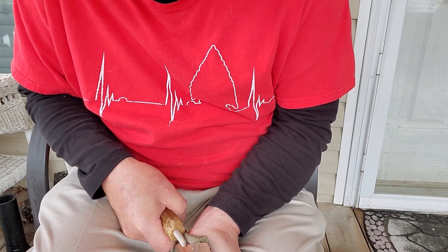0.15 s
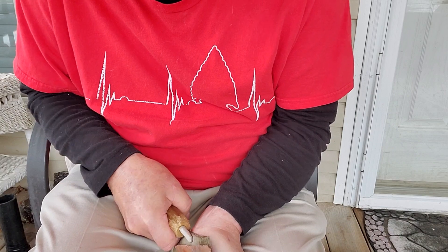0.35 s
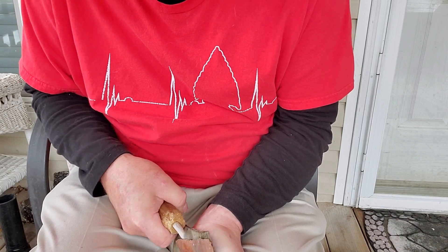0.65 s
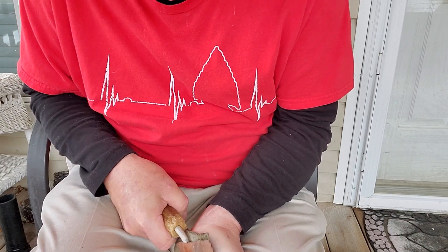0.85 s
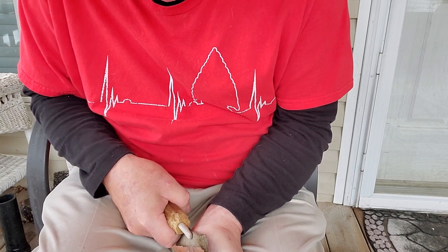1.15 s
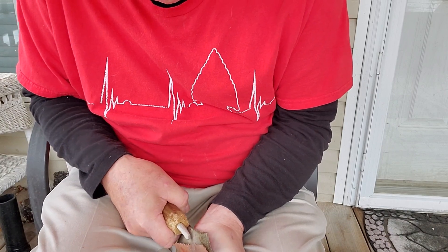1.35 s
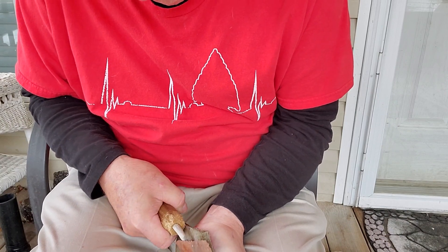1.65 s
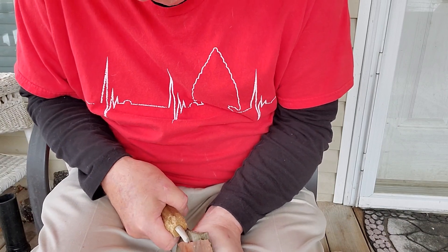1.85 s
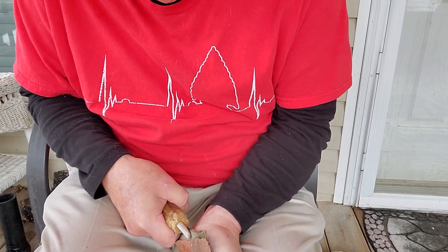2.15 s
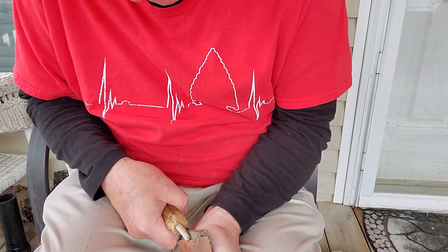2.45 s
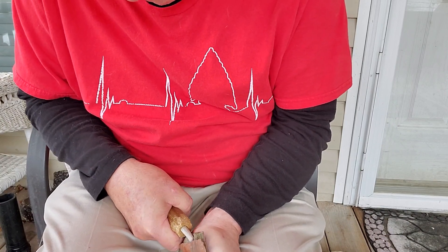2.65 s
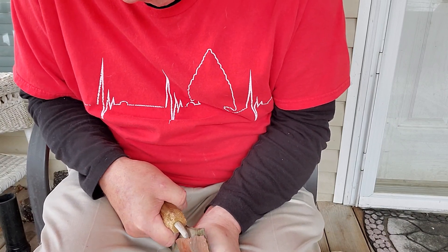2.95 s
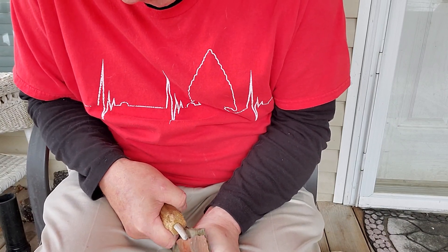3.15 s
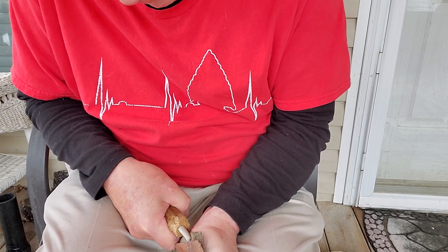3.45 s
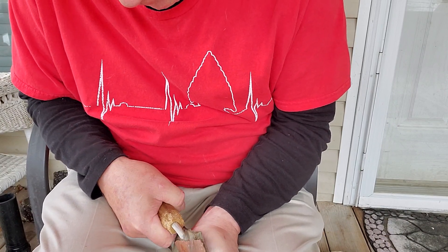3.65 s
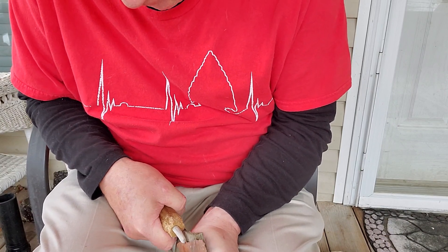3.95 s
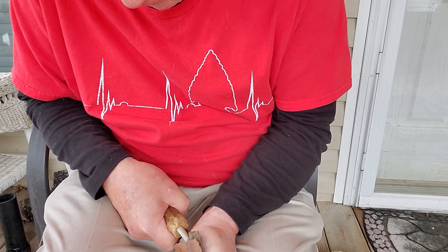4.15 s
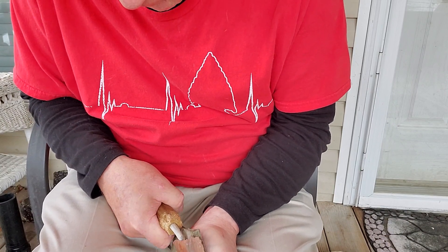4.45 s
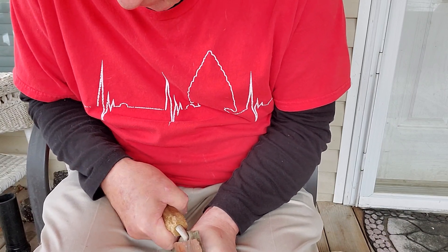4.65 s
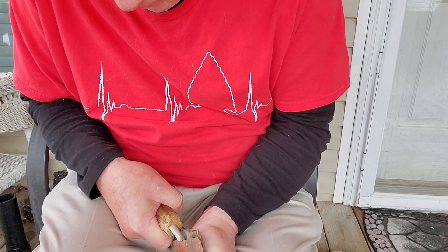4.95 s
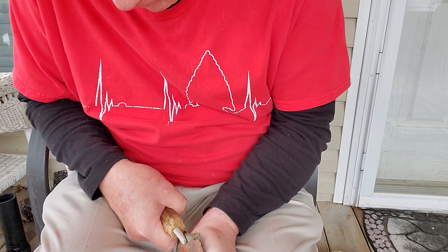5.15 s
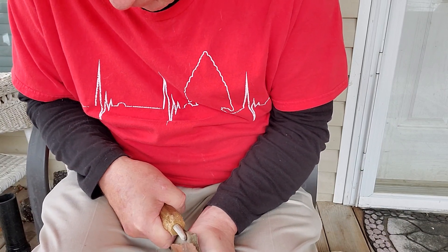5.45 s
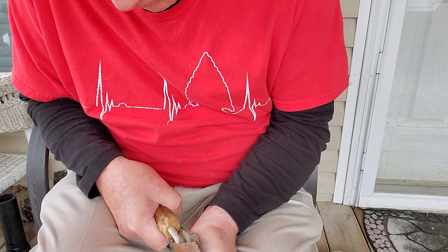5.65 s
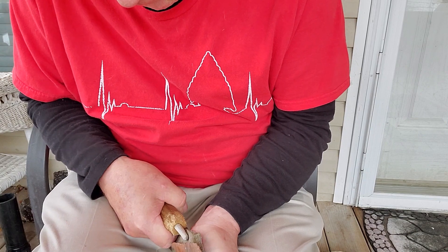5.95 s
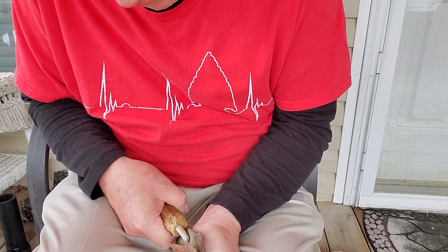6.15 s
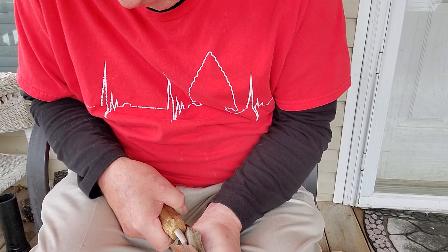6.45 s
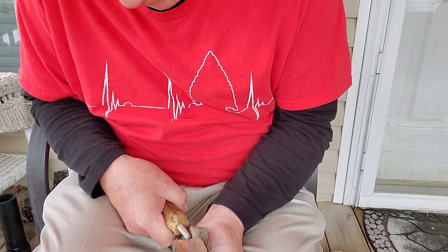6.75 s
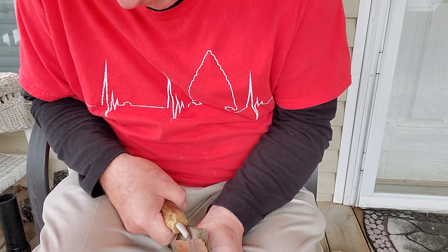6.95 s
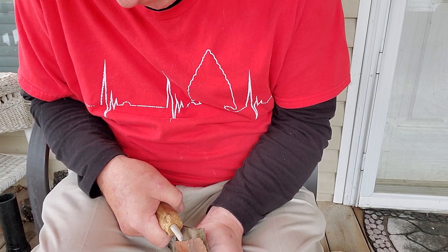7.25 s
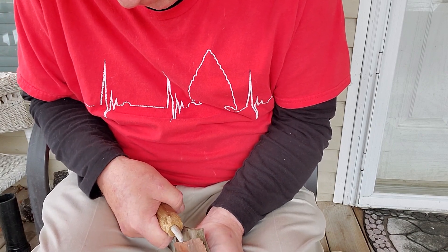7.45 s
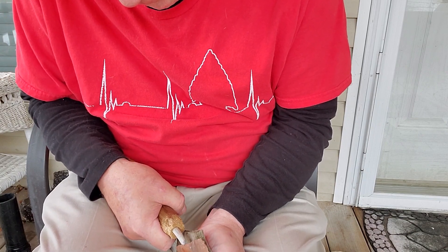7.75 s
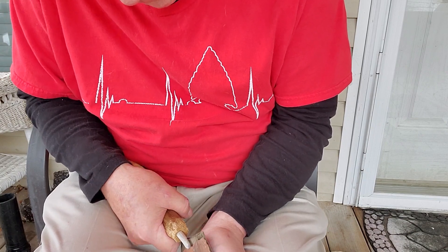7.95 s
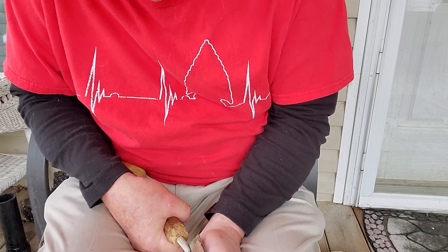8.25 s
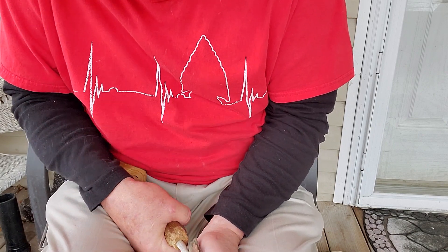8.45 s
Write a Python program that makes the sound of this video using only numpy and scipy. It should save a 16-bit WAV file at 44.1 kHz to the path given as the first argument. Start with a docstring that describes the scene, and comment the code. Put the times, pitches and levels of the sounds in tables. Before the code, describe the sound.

On a porch, a hand tool presses flakes off a piece of flint close to a stereo microphone, slightly to the right. Chips snap away in irregular clusters of tiny, bright cracks, loudest in the middle, with brief gritty rubs between them. Dull knocks sound in the wooden boards, mostly in the second half, and the snaps fade to light ticks. Distant traffic and an engine hum low throughout.

```python
"""A porch, with flint being pressure flaked close to a stereo microphone pair, a little to the right.
The tool tip slips and chips snap off in clusters of tiny cracks that ring stone, tool and hands.
Grit rubs under the tool, and dull knocks sound in the wooden boards nearby.
Far off, traffic rumbles and an engine pulls through two gears. A faint broad hiss lies behind it all;
a narrow hiss and one short peep sit near 4 kHz."""
import sys
import numpy as np
from scipy import signal
from scipy.fft import rfft, irfft, next_fast_len
from scipy.io import wavfile
from scipy.ndimage import uniform_filter1d, map_coordinates

SR = 44100
rng = np.random.default_rng(int(sys.argv[2]) if len(sys.argv) > 2 else 0)


def inscribe(sig):
    """Save sig as 16-bit PCM at rate SR to the path in sys.argv[1].

    A 1-D sig is mono; a 2-D sig holds one channel per row.
    Samples are clipped to [-1, 1] before scaling.
    """
    pcm = np.round(np.clip(np.atleast_2d(sig).T, -1, 1) * 32767)
    wavfile.write(sys.argv[1], SR, pcm.astype(np.int16))


N = 379260

# Swell of the far traffic and of the narrow hiss. Each row: time in seconds, level in dB.
RUMBLE_LEVEL = [(0, -53.5), (.8, -50.5), (3.2, -50), (3.55, -47.5), (3.9, -51), (5, -46), (5.7, -47),
                (6.8, -46), (7.3, -46.5), (8.6, -49)]
NARROW_HISS_LEVEL = [(0, -79), (.3, -76), (.6, -79), (1.2, -90), (3, -86.5), (7.5, -93.5), (8.6, -87)]
# Colours of the background. Each row: frequency in Hz, relative noise density in dB.
RUMBLE_SPECTRUM = [(15, -29.5), (25, -0.5), (55, -4), (85, 3.5), (117, -2.5), (224, -5.5), (361, -9.5),
                   (460, -13), (600, -65.5)]
RUSH_SPECTRUM = [(250, -41), (430, -14.5), (454, -4), (528, -3), (1010, -6), (1110, -10), (1830, -11.5),
                 (3600, -29), (4680, -57.5), (7920, -120)]
HISS_SPECTRUM = [(1940, -35.5), (3300, 0.5), (4830, -2.5), (5750, -2.5), (8640, -13.5), (11900, -12),
                 (13400, -23.5), (15100, -11), (16300, -25.5)]
NARROW_HISS_SPECTRUM = [(3500, -31.5), (3900, -5.5), (4150, 1), (4400, -5.5), (4900, -29)]
# The far engine's note, one list a gear. Each row: time in seconds, pitch in Hz, level in dB.
GEAR_NOTES = [
    [(0, 84.8, -47.5), (.4, 88.66, -47), (1.0, 91.4, -42), (1.4, 91.54, -50.5), (2, 93.9, -47),
     (3.2, 96.64, -52.5), (3.5, 97.3, -49), (4.3, 98.9, -66.5)],
    [(4.4, 80, -63.5), (5.37, 84.7, -38), (5.66, 83.75, -43.5), (6.17, 82.6, -41.5), (6.6, 85.8, -46),
     (7.34, 85.4, -45), (7.62, 85.2, -39), (7.85, 86.5, -42), (8.6, 88.1, -42.5)],
]
# Thin tones above it. Each row: start and end in seconds, first and last pitch in Hz, level in dB.
ENGINE_WHINES = [(2.6, 3.401, 368.8, 374.6, -61), (4.803, 8.613, 301.4, 340, -59.5),
                 (4.911, 8.628, 147.7, 161.3, -61), (6.724, 8.59, 267.8, 279, -56)]
# Knocks in the nearby boards. Each row: start in seconds, boom pitch in Hz, boom level in dB,
# then clack and rattle in dB over the boom.
BOARD_KNOCKS = [(.832, 218, -30, -12.5, -24.5), (.842, 195, -30.5, -13, -34),
                (1.097, 233.9, -50.5, -5, -12), (1.914, 211, -43, -15, -19), (3.55, 202.2, -44.5, -20, -17),
                (4.134, 300.5, -38, -0.5, -8), (4.362, 212.8, -29, -8.5, -21),
                (4.377, 214.2, -25.5, -20, -21.5), (4.399, 244, -31, -5, -18), (4.416, 249, -36, -5, -27),
                (4.439, 234, -51.5, -8.5, -29), (4.53, 210, -40.5, -15, -21),
                (4.588, 243.2, -40.5, -11.5, -17), (4.734, 205, -35.5, -12, -14),
                (5.099, 239, -38.5, -12, -22.5), (5.808, 280.4, -27, -8.5, -12.5),
                (5.819, 255, -37.5, 1.5, -11), (5.88, 240, -36, -9, -10), (6.195, 254.5, -27, -13.5, -15.5),
                (6.285, 300, -41.5, -18, -22), (6.663, 230.7, -22, -12.5, -19),
                (6.677, 224, -23, -7.5, -26.5), (6.702, 270.4, -24, -5.5, -14),
                (6.755, 318, -33.5, -10.5, -27), (6.766, 241, -28, -11, -22.5),
                (6.809, 224.6, -34, -29, -36), (6.971, 265, -44, -22, -26.5), (7.338, 257, -45, -25, -29),
                (8.528, 243, -41.5, -21, -22.5)]
# Board resonances: joist, boom, plank, clack, rap, rattle, tick. Each row: width in Hz, t60 in seconds.
BOARD_RESONANCES = [(90, 0.083), (170, 0.081), (170, 0.066), (250, 0.058), (600, 0.087), (1800, 0.11),
                    (2500, 0.11)]
# The close peep. Its row: start in seconds, pitch in Hz, level in dB.
PEEP_NOTE = [(7.77, 4050, -66)]
# Grit under tool and fingers. Each row: start, rise and t60 in seconds, centre in Hz, level in dB.
GRIT_RUBS = [(0.964, .004, 0.27, 4700, -58), (1.11, 0.0039, .2, 3320, -63.5),
             (1.487, 0.0033, 0.11, 3270, -58), (1.555, 0.0037, 0.37, 3500, -74),
             (1.8, 0.0024, 0.23, 2900, -66), (1.843, 0.0051, 0.16, 3500, -73),
             (1.915, 0.0056, 0.13, 5500, -81), (2.254, 0.0038, .08, 2500, -70.5),
             (4.68, 0.0072, 0.2, 10660, -58), (5.334, .02, 0.05, 3240, -35.5),
             (5.726, 0.0038, 0.23, 3770, -56), (5.835, .001, 0.03, 9050, -67),
             (5.866, .003, .12, 3730, -49), (5.938, 0.0046, 0.17, 3900, -62), (6.49, .05, .3, 5900, -72.5),
             (6.539, 0.011, .2, 11200, -76), (6.627, .001, 0.053, 7900, -76), (6.66, .002, .06, 13200, -67),
             (7.66, 0.0041, 0.11, 4500, -62.5), (7.986, 0.0029, 0.21, 8600, -69)]
# Cracks in the flint. Each row: time in seconds, body level in dB, body and ring pitch in Hz,
# then ring, fizz and knock in dB over the body.
FLINT_CRACKS = [(0.1266, -38, 2490, 6000, 0.5, -45, -13), (.13, -49, 2500, 6300, -18, -42, -13),
                (0.3778, -37, 2280, 6100, -2, -11, -12.5), (0.3818, -34, 2920, 6020, 5, -2.5, -13),
                (0.8561, -35.5, 2460, 6070, 0.5, -42, -10), (0.8583, -43, 2460, 6100, -5, -40, -7),
                (.8686, -60, 2440, 6400, -3, -45, 4), (.9622, -47.5, 2410, 5100, -9, -30, -16),
                (0.9883, -33.5, 2770, 6250, 9, -4, -12), (0.9928, -28, 2380, 6250, 0.5, 2.5, -13),
                (.9963, -27, 2260, 6700, -12, -18, -24), (1.0083, -42.5, 2260, 6300, -13, -17.5, -9),
                (1.114, -50, 2400, 4850, -21, -40, -9), (1.4873, -51, 3070, 5030, -6, -35, -26),
                (1.4924, -53, 2940, 4910, -8, -39, -7), (1.5578, -58, 2620, 5400, -20, -36, 1),
                (1.604, -57, 2250, 5200, -15, -28, 2), (1.793, -60, 2370, 6700, -15, -39.5, -12),
                (1.8, -47.5, 2550, 5200, -31.5, -50, -12), (1.8445, -51.5, 2200, 5000, -25, -42, -16),
                (1.8515, -58, 3300, 5450, -13, -36, -8), (2.099, -21.5, 1980, 6430, -5.5, -3, -9.5),
                (2.1012, -31.5, 2270, 6400, -10, -6, -20), (2.108, -29.5, 2540, 6240, -19, -21.5, -8.5),
                (2.1109, -33.5, 2470, 6270, -9.5, -24, -20), (2.254, -57, 2320, 5400, -26, -35, -7.5),
                (2.7464, -25.5, 2430, 6390, 5.5, -3, -15.5), (2.7479, -28, 2900, 6080, -10, -18, -9),
                (2.754, -48, 2440, 6450, -3.5, -6.5, 4), (2.8166, -59, 2500, 5400, -9, -25, -10),
                (3.4593, -14.5, 2500, 5980, 1.5, -10.5, -13), (3.4627, -20.5, 2640, 6200, 4.5, -11, -13.5),
                (3.4653, -31, 2570, 6200, -3.5, -12.5, -5), (3.4675, -34.5, 2550, 6300, -2.5, -19, -22),
                (3.4715, -31, 2400, 6350, -8, -18.5, -16), (3.9732, -49, 2460, 6200, -5.5, -9.5, -10),
                (3.9771, -38.5, 2660, 6100, -3, -11.5, -32), (3.9845, -43.5, 2400, 6200, 2, -5.5, -20),
                (4.1247, -22.5, 2380, 6130, 5.5, -3, -10), (4.1765, -14, 2380, 5760, -3, -8, -13.5),
                (4.184, -13, 2170, 6030, -4.5, -17.5, -7), (4.1854, -28, 2165, 5830, -2, -12.5, -24),
                (4.194, -26, 2280, 4960, -13, -12.5, -19), (4.1964, -31, 2010, 6100, -23, -26, -18),
                (4.5619, -39, 2700, 5600, -2, -14.5, -36), (4.5642, -42.5, 2637, 5800, -0.5, -15, -28),
                (4.588, -59, 2700, 5350, -12, -20, -2), (4.7057, -36, 2500, 6470, 1, -14, -35),
                (4.7132, -34.5, 2906, 5000, -19, -25.5, -8), (4.72, -20, 2520, 6330, -0.5, -11, -22),
                (4.7276, -28.5, 2480, 6040, -1, -11, -10.5), (4.986, -54, 3110, 5500, 2.5, -18, -6.5),
                (5.2434, -25, 2700, 7500, 8, -5.5, -10), (5.247, -49, 2760, 6130, 3, -20, -0.5),
                (5.2525, -40.5, 2520, 7970, 0, -10, -6), (5.3403, -31.5, 3080, 6100, -9, -22, -1.5),
                (5.3427, -23.5, 2880, 6850, 0.5, -9, -13), (5.3451, -32.5, 2740, 5800, 3.5, -20, -28),
                (5.359, -43, 3020, 5900, -19.5, -12, -17), (5.7258, -45.5, 2720, 5050, -7, -16, -14),
                (5.736, -50, 3000, 5280, -13, -25, -5), (5.8605, -41, 2970, 6060, 2.5, -11.5, -6),
                (5.871, -29, 2600, 5500, -13.5, -13, -21), (5.8822, -40, 2200, 5350, -23, -26, -12),
                (5.9368, -53, 2800, 5370, -8, -32, -7), (6.6105, -59.5, 3200, 6790, -6, -12, -7.5),
                (7.2746, -64, 2300, 7000, -2, -6, -2.5), (7.3748, -69.5, 2325, 6750, 2, -16, 3),
                (7.664, -59.5, 3425, 4880, 4.5, -34, -6), (7.7457, -62.5, 2025, 4900, -2.5, -17, -5),
                (7.9, -64, 2000, 5210, -1, -23, -5), (8.1655, -67.5, 3300, 5786, 10.5, -8, -1.5),
                (8.3112, -72, 2000, 6400, 1, -20, 0), (8.4483, -71, 2655, 5220, 3.5, -13, 1)]
# Resonances of stone, tool and hands: body, ring, fizz, edge, knock, thump.
# Each row: width in Hz for a full snap, length of the push as a multiple of the crack's.
STONE_RESONANCES = [(1450, 1.4), (2480, 0.72), (3060, 1.2), (3449, 1), (900, 0.83), (545, 0.99)]
# The stone's narrower modes. Each row: pitch in Hz, width in Hz, level in dB over the ring.
FLAKE_MODES = [(1870, 300, -25), (2626, 130, -30), (3850, 99, -33), (5616, 230, -27.5)]
# Decay of the porch. Each row: frequency in Hz, t60 in seconds.
PORCH_DECAY = [(300, 0.24), (1300, 0.12), (3000, .14), (6000, .12), (15000, .13)]
# Image of far sounds and of the boards at the pair. Each row: frequency in Hz, left-right correlation.
FAR_LIKENESS = [(60, .94), (130, .92), (290, .75), (640, 0), (1410, -.25), (3100, .2), (6820, .05)]
BOARD_LIKENESS = [(100, .94), (300, .88), (640, .4), (1410, -.2), (3100, .2)]
# Image of close sounds. Each row: frequency in Hz, side over mid in dB.
CLOSE_SPREAD = [(300, -14), (2400, -13), (4400, -8), (8000, -5), (15000, -5)]


def amp(db):
    return 10 ** (np.asarray(db) / 20)


def unit_rms(x):
    return x / np.sqrt(np.mean(x ** 2) + 1e-20)


def along(points, hz):
    """Read between (Hz, value) points on a log frequency axis."""
    point_hz, values = np.transpose(points)
    return np.interp(np.log(hz + 1), np.log(point_hz + 1), values)


def curves(rows):
    """One value per sample for each column after the time."""
    times, *columns = np.transpose(rows)
    return [np.interp(np.arange(N) / SR, times, column) for column in columns]


def wobble(rate):
    """A smooth random curve, rate knots a second."""
    return map_coordinates(rng.standard_normal(int(N * rate / SR) + 4), [np.arange(N) * rate / SR])


def filtered(x, response):
    """Shape x by a gain given as a function of Hz."""
    size = next_fast_len(N + SR // 2)
    return irfft(rfft(x, size) * response(np.fft.rfftfreq(size, 1 / SR)), size)[..., :N]


def far_pair(pair, likeness):
    """Sound from a distance: two unrelated signals mixed to the given left-right likeness."""
    def mid_side_gains(hz):
        angle = np.arccos(np.clip(along(likeness, hz), -1, 1)) / 2
        return np.array([np.cos(angle), np.sin(angle)])
    mid, side = filtered(pair, mid_side_gains)
    return np.array([mid + side, mid - side])


def close_pair(pair):
    """Sound close to the microphones, a little to the right: narrow in the bass, wider in the treble."""
    side = filtered(pair[1], lambda hz: amp(along(CLOSE_SPREAD, hz)))
    return np.array([pair[0] + side, pair[0] - side]) * amp([[-.6], [.6]])


def porch(x, tilt_db):
    """Wall and boards answer; each frequency dies at its own speed, with a new tail every quarter second."""
    out = np.zeros((2, N + SR))
    step, delay = SR // 4, 120  # samples
    for at in range(0, N, step):
        if not x[at:at + step].any():
            continue
        hz, t, noise = signal.stft(rng.standard_normal((2, step)), SR, nperseg=128)
        gain = amp(-60 * t / along(PORCH_DECAY, hz)[:, None] + tilt_db * hz[:, None] / SR)
        tail = signal.istft(noise * gain, SR, nperseg=128)[1]
        wet = signal.fftconvolve(x[None, at:at + step], tail / np.linalg.norm(tail[0]), axes=1)
        out[:, at + delay:at + delay + wet.shape[1]] += wet
    return out[:, :N]


def far_noise(db, spectrum, patchy_db):
    """Distant coloured noise whose gain varies in random patches of time and frequency."""
    bins = signal.stft(rng.standard_normal((2, N)), nperseg=512)[2]
    patches = uniform_filter1d(rng.standard_normal(bins.shape[1:]), 6, axis=0)
    patches = unit_rms(uniform_filter1d(patches, 10, axis=1))
    noise = signal.istft(bins * amp(patchy_db * patches), nperseg=512)[1][:, :N]
    coloured = filtered(noise, lambda hz: amp(along(spectrum, hz)))
    return far_pair(amp(db) * unit_rms(coloured), FAR_LIKENESS)


def tone(rows, waver_hz, flutter_db, fade_s):
    """A slightly unsteady sine that fades in and out at the ends of its rows."""
    hz, db = curves(rows)
    t = np.arange(N) / SR
    fade = np.clip(np.minimum(t - rows[0][0], rows[-1][0] - t) / fade_s + .5, 0, 1)
    level = amp(db + flutter_db * wobble(11))
    phase = 2 * np.pi * np.cumsum(hz + waver_hz * wobble(6)) / SR
    return fade * level * np.sin(phase)


def strikes(times, db, hz, width_hz, t60, rise, size):
    """Two unrelated trains: each strike is dying noise through three like resonances in series."""
    t, f = np.arange(size) / SR, np.fft.rfftfreq(size, 1 / SR)
    hz, width_hz, t60, rise = (np.reshape(v, (-1, 1, 1)) for v in (hz, width_hz, t60, rise))
    push = rng.standard_normal((len(times), 2, size)) * amp(-60 * t / t60) * (1 - np.exp(-t / rise))
    resonance = 1j * f * width_hz / (hz * hz - f * f + 1j * f * width_hz)
    rung = irfft(rfft(push) * resonance ** 3, size)
    power = uniform_filter1d(rung ** 2, size=size // 32, mode="constant")
    rung *= amp(db)[:, None, None] / np.sqrt(power.max(axis=2, keepdims=True))
    at = (np.round(times * SR).astype(int)[:, None] + np.arange(size)).ravel()
    return np.array([np.bincount(at, rung[:, k].ravel(), N + SR)[:N] for k in range(2)])


def traffic():
    """Far traffic: a low rumble, and a higher rush that follows a share of its swell."""
    rumble_db, = curves(RUMBLE_LEVEL)
    rush_db = -57.5 + .2 * (rumble_db - rumble_db.mean())
    rumble = far_noise(rumble_db, RUMBLE_SPECTRUM, patchy_db=1.5)
    return rumble + far_noise(rush_db, RUSH_SPECTRUM, patchy_db=1.6)


def hiss():
    """Faint and far: a broad hiss and a narrow one near 4 kHz, both drifting in level."""
    narrow_db, = curves(NARROW_HISS_LEVEL)
    broad = far_noise(-78 + .8 * wobble(3), HISS_SPECTRUM, patchy_db=3.2)
    return broad + far_noise(narrow_db + 3.3 * wobble(1.7), NARROW_HISS_SPECTRUM, patchy_db=1.7)


def engine():
    """A distant engine: the firing note climbs, drops at the gear change and climbs again."""
    note = sum(tone(gear, waver_hz=.6, flutter_db=1.0, fade_s=.068) for gear in GEAR_NOTES)
    whines = sum(tone([(start, low_hz, db), (end, high_hz, db)], waver_hz=1.5, flutter_db=1.4, fade_s=.3)
                 for start, end, low_hz, high_hz, db in ENGINE_WHINES)
    return note * amp([[-.7], [.7]]) + whines


def boards():
    """Nearby, each knock shakes the boards with a dying rumble in seven resonances."""
    times, boom_hz, boom_db, clack, rattle = np.transpose(BOARD_KNOCKS)
    clack_db, rattle_db = boom_db + clack, boom_db + rattle
    # joist, boom, plank, clack, rap, rattle, tick
    levels = [boom_db - 11.5, boom_db, boom_db - 12, clack_db, clack_db - 10, rattle_db, rattle_db - 12.5]
    pitches = [115, boom_hz, 400, 620, 1100, 2000, 4800]
    pair = sum(strikes(times, db, hz, width_hz, t60, rise=.0015, size=6144)
               for db, hz, (width_hz, t60) in zip(levels, pitches, BOARD_RESONANCES))
    return far_pair(pair + amp(-8.5) * porch(pair[0], tilt_db=-9), BOARD_LIKENESS)


def peep():
    """One short, thin peep close by: a narrow band of dying noise."""
    times, hz, db = np.transpose(PEEP_NOTE)
    return close_pair(strikes(times, db, hz, width_hz=290, t60=.079, rise=.001, size=4096))


def grit():
    """Grit rubs under the tool, close up: a broad band of noise, broken into grains."""
    times, rise, t60, hz, db = np.transpose(GRIT_RUBS)
    rubs = strikes(times, db, hz, width_hz=1.14 * hz, t60=t60, rise=rise, size=12288)
    grains = amp(3.5 * wobble(300))
    return close_pair(rubs * grains)


def flint():
    """Close up, each crack is a few milliseconds of noise that rings stone, tool and hands."""
    times, body_db, body_hz, ring_hz, ring, fizz, knock = np.transpose(FLINT_CRACKS)
    ring_db, fizz_db, knock_db = body_db + ring, body_db + fizz, body_db + knock
    touch_to_snap_db = [-50, -22]  # a light touch clinks longer and more narrowly than a full snap
    crack_t60 = np.interp(body_db, touch_to_snap_db, [.008, .0065])
    width_share = np.interp(body_db, touch_to_snap_db, [.76, 1])
    # body, ring, fizz, edge, knock, thump
    levels = [body_db, ring_db, fizz_db, fizz_db - 3.5, knock_db, knock_db - 4]
    pitches = [body_hz, ring_hz, 11066, 14800, 1380, 560]
    pair = sum(strikes(times - .0004, db, hz, width_hz * width_share, crack_t60 * length,
                       rise=.041 * crack_t60, size=1024)
               for db, hz, (width_hz, length) in zip(levels, pitches, STONE_RESONANCES))
    # the stone sings briefly, at a new pitch and strength for every crack
    for mode_hz, width_hz, mode_db in FLAKE_MODES:
        db = ring_db + mode_db + rng.normal(0, 4, len(times))
        hz = mode_hz * rng.normal(1, .03, len(times))
        pair += strikes(times, db, hz, width_hz, t60=.0034, rise=.000097, size=3072)
    echo = far_pair(porch(pair[0], tilt_db=.5), FAR_LIKENESS)
    return close_pair(pair) + amp(-10.5) * echo


def scene():
    """Everything at the microphone pair, from near to far."""
    return flint() + grit() + peep() + boards() + engine() + traffic() + hiss()


def record(dry):
    """The microphone: a dip between its port resonances, soft overload on loud snaps, a steep band limit."""
    dip_hz, dip_width_hz, dip_db = 9600, 1900, -6
    ceiling, top_hz = .8, 16200
    coloured = filtered(dry, lambda hz: amp(dip_db * np.exp(-((hz - dip_hz) / dip_width_hz) ** 2)))
    softened = coloured / (1 + np.abs(coloured / ceiling) ** 3) ** (1 / 3)
    return filtered(softened, lambda hz: 1 / (1 + (hz / top_hz) ** 160))


dry = scene()
out = record(dry)
inscribe(out)
```